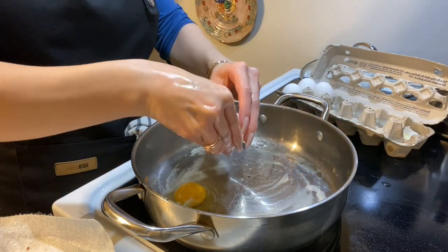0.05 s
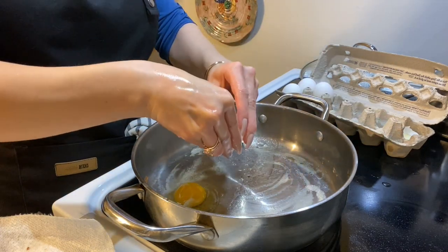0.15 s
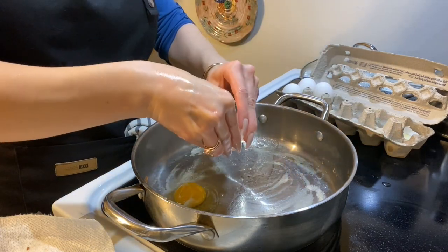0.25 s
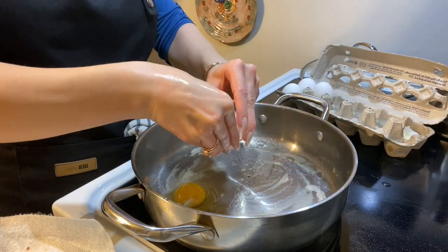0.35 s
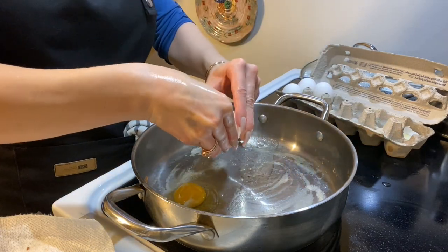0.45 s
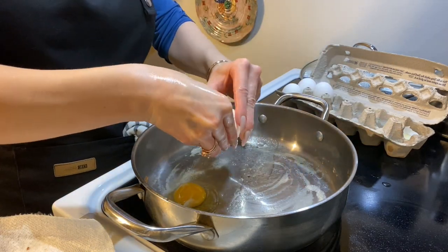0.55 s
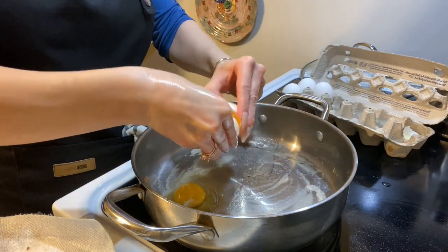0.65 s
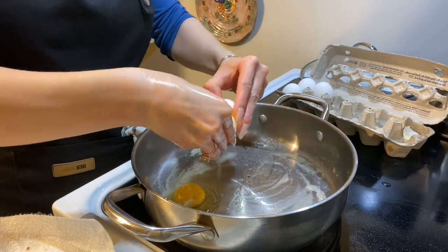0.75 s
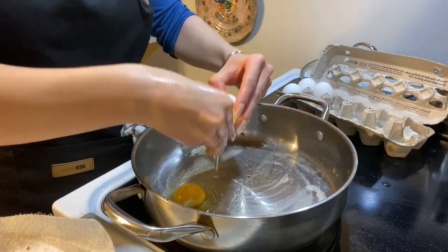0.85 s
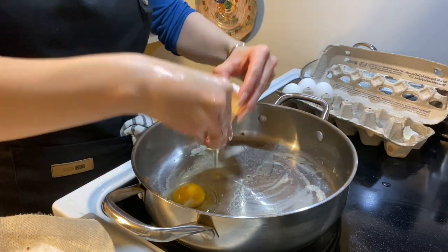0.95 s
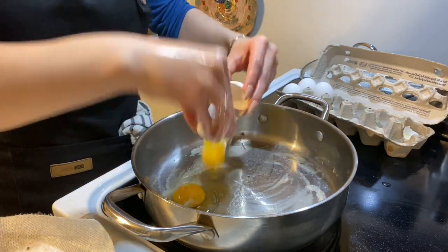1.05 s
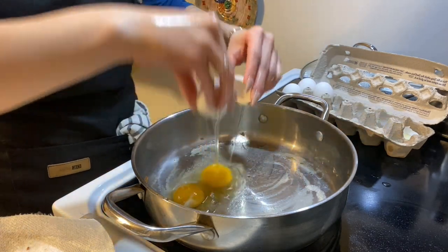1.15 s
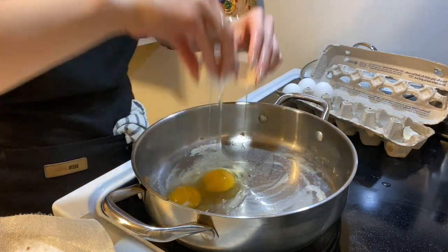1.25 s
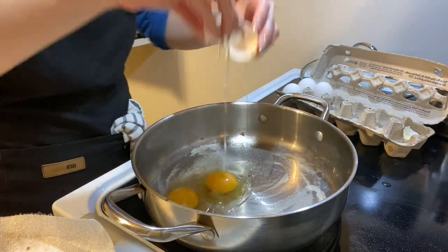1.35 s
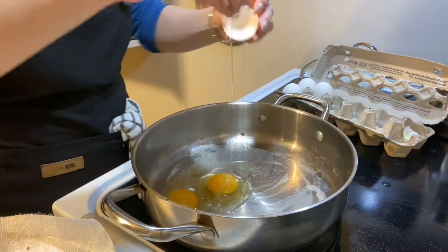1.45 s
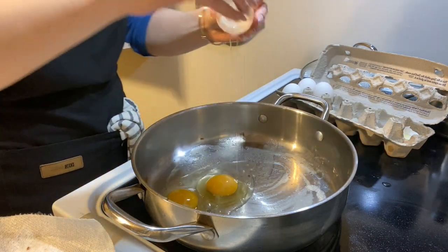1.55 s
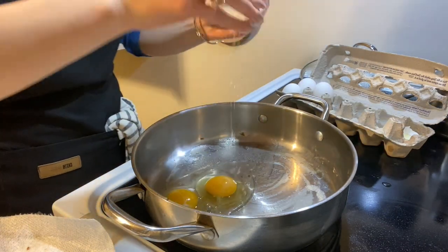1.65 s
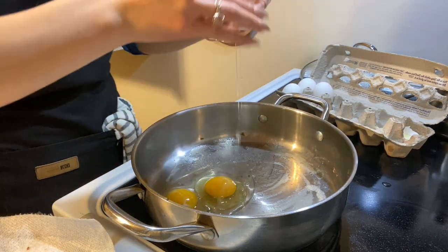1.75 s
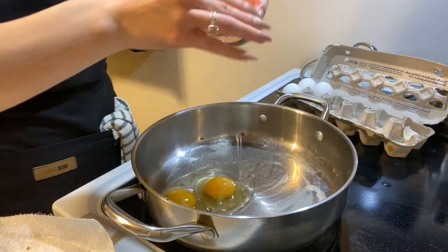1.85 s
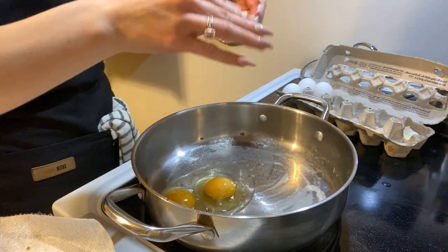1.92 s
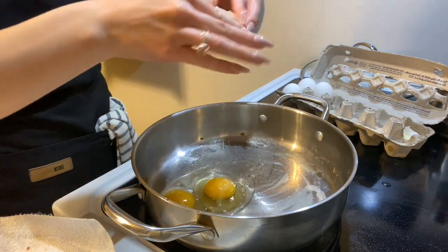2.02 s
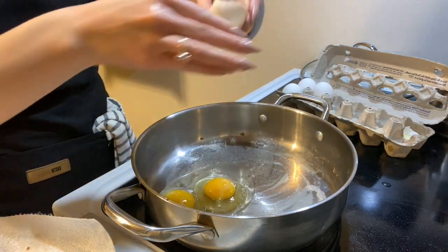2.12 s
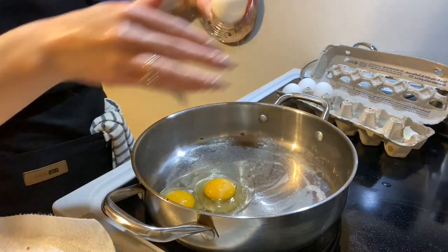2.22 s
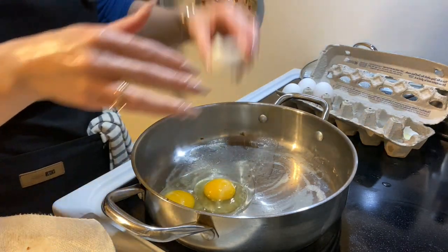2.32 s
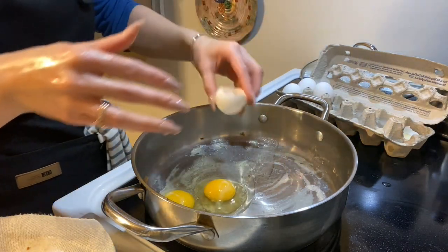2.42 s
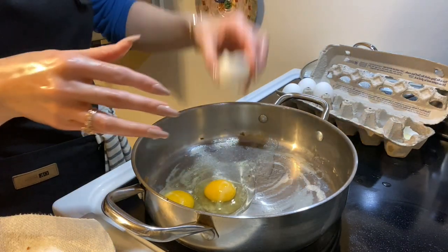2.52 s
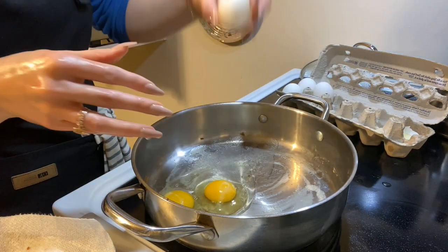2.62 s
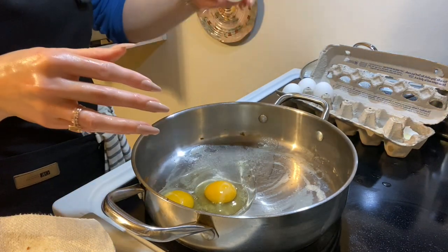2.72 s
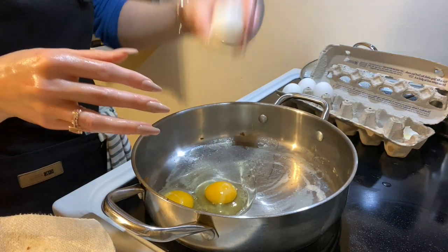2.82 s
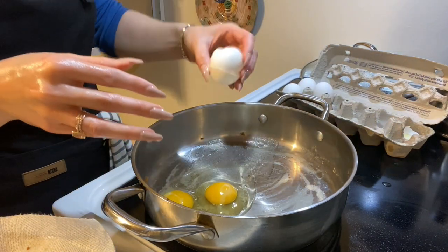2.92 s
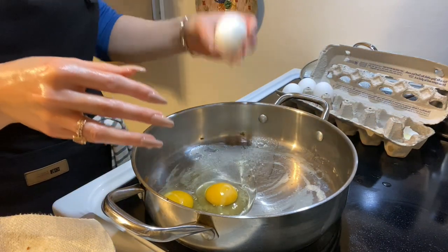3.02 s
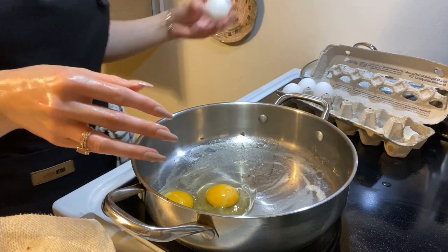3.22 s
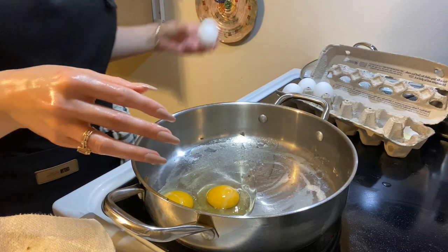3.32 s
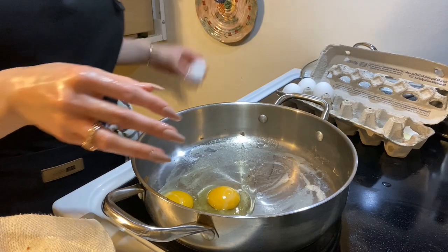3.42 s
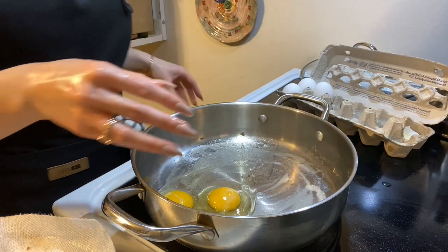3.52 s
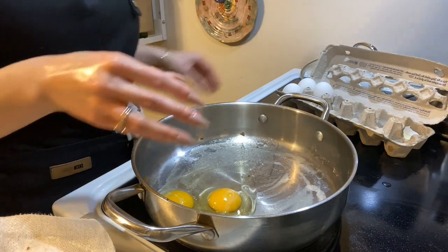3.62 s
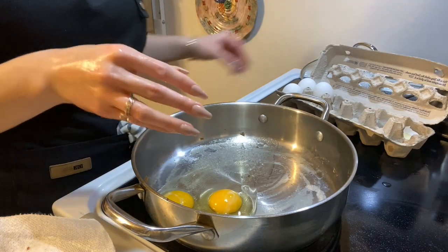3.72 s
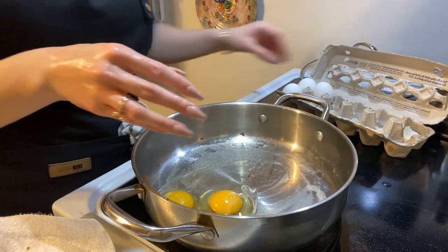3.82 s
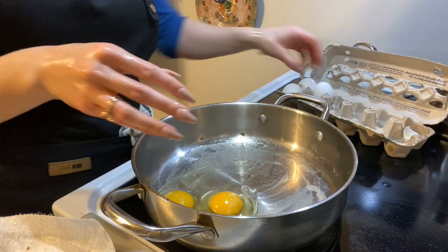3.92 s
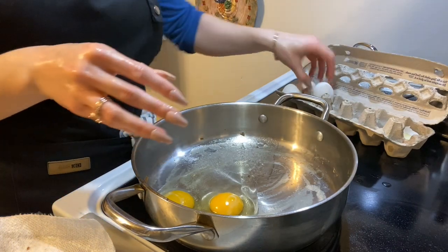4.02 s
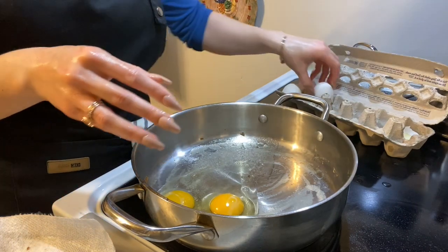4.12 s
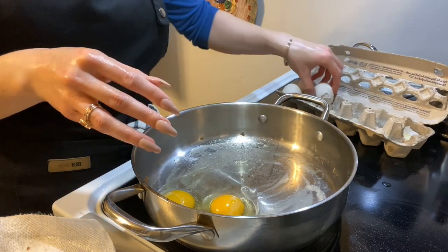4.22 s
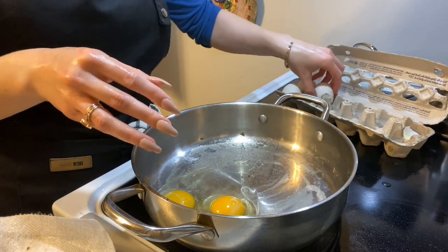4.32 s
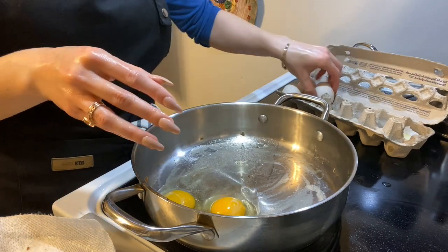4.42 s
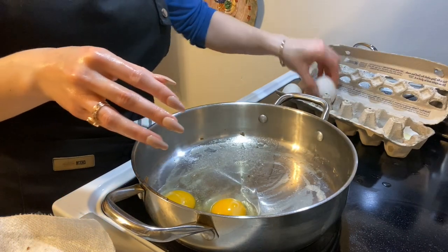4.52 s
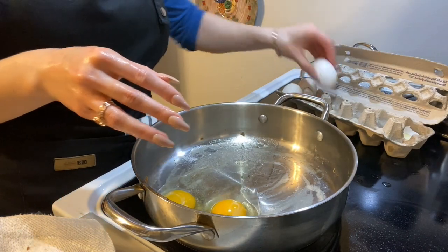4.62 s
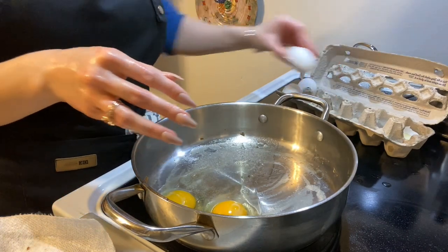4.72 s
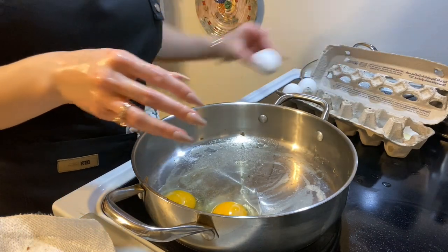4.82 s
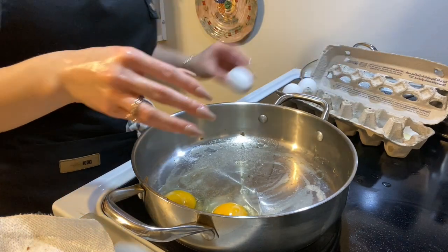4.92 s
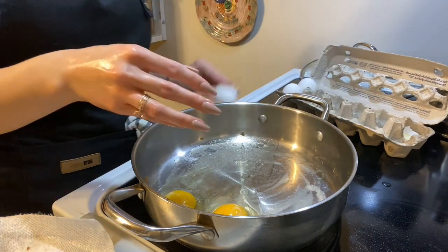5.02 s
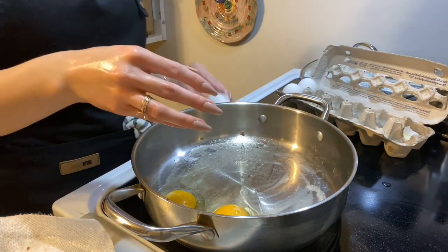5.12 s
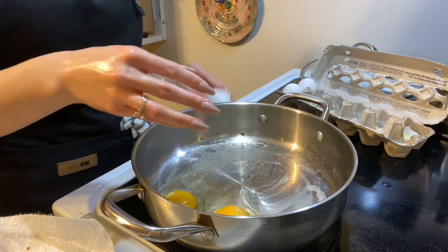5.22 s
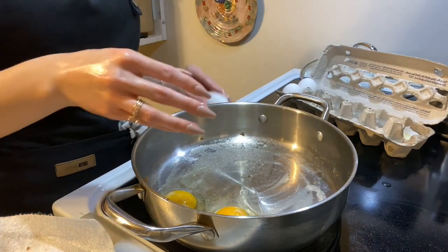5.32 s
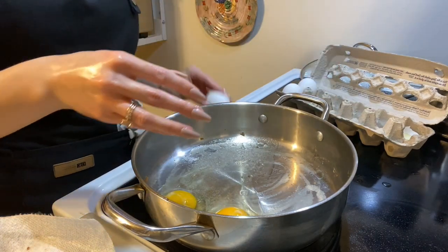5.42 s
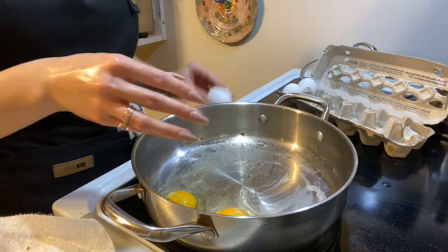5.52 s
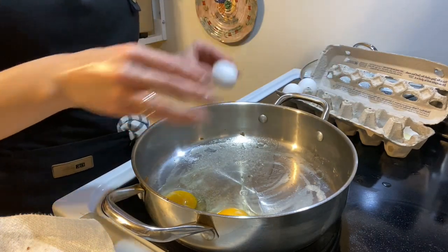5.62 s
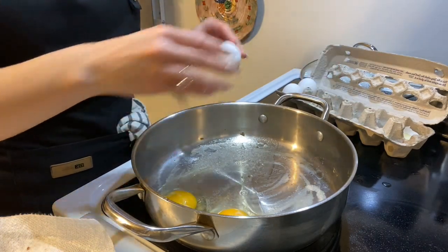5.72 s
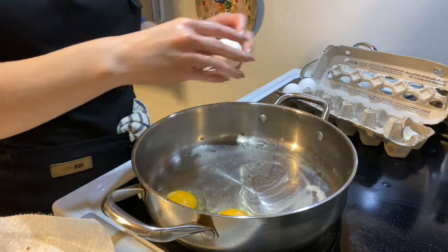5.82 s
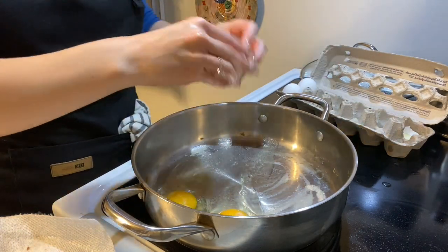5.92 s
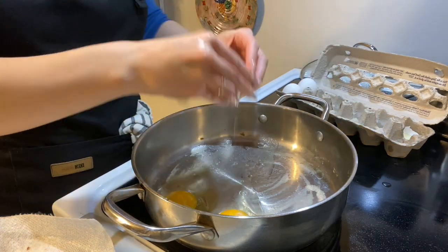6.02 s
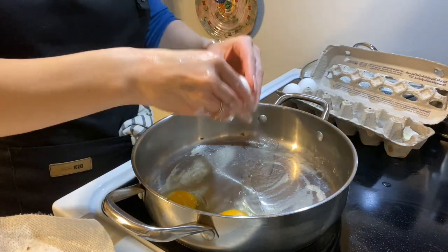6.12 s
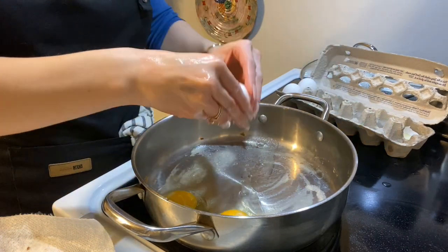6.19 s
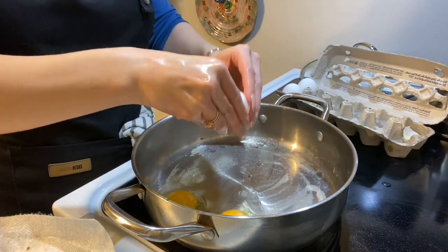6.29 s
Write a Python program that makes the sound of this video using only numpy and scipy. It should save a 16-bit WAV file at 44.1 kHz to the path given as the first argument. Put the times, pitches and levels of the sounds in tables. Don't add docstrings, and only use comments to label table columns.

```python
import sys
import numpy as np
from scipy import signal
from scipy.fft import rfft, irfft, next_fast_len
from scipy.io import wavfile
from scipy.ndimage import uniform_filter1d

SR = 44100
rng = np.random.default_rng(int(sys.argv[2]) if len(sys.argv) > 2 else 0)


def ratio_of_db(decibels):
    return 10 ** (np.asarray(decibels, float) / 20)


def wrap_up_sound(samples):
    columns = np.atleast_2d(samples).T
    tamed = np.clip(columns, -1, 1)
    steps = np.round(tamed * 32767).astype(np.int16)
    wavfile.write(sys.argv[1], SR, steps)


N = 280035

# [t/s, peak level/dB, build-up/s, ring time as a factor, left over right/dB]
TAP_BLOWS = [
    (5.055, -4.5, .0025, 0.63, 2.5),
    (5.238, -10, 0.0037, 0.33, 3.5),
    (5.429, -16.5, 0.00317, 0.44, 3.5),
]


def evened(x):
    return x / np.sqrt(np.mean(x ** 2) + 1e-20)


def peaked(x):
    return x / (np.abs(x).max() + 1e-20)


def read(points, hz):
    f, value = np.transpose(points)
    return np.interp(np.log(hz + 1), np.log(f + 1), value)


def add(mix, s, sound, pan_db):
    part = mix[:, round(s * SR):][:, :len(sound)]
    part += ratio_of_db([[pan_db / 2], [-pan_db / 2]]) * sound[:part.shape[1]]


def band(x, lo_hz, hi_hz):
    return signal.sosfilt(signal.butter(2, [lo_hz, hi_hz], "band", fs=SR, output="sos"), x)


def ring(x, hz, width_hz):
    r = np.exp(-np.pi * width_hz / SR)
    return signal.lfilter([1 - r], [1, -2 * r * np.cos(2 * np.pi * hz / SR), r * r], x)


def splinters(length_s, rise=0.1):
    length_s = max(length_s, 0.002)
    t = np.arange(round(0.12 * SR)) / SR
    slips = rng.standard_normal(len(t)) * ratio_of_db(2.54 * rng.exponential(1, len(t)))
    return slips * (1 - np.exp(-t / (rise * length_s))) * ratio_of_db(-60 * t / length_s)


def snaps(rows, width_hz, wall_hz, length_s, pan_db):
    out = np.zeros((2, N))
    for s, db, hz, bright_db in rows:
        drive = splinters(length_s)
        hollow = peaked(ring(ring(drive, hz, width_hz), hz, 5.0 * width_hz))
        wall = ratio_of_db(min(0.2 * bright_db - 3.0, 0)) * peaked(ring(drive, wall_hz, 740))
        edge = ratio_of_db(bright_db) * peaked(band(drive, 3100, 14000))
        add(out, s, ratio_of_db(db) * (hollow + wall + edge), pan_db + 3.4 * rng.standard_normal())
    return out


def rubbing(rows, hz, width_hz, rough_db):
    s, level_db, bright_db, fading_s = np.transpose(rows)[:, :, None]
    t = np.arange(N) / SR
    away = np.maximum(t - s, (s - t) / 0.82) / fading_s
    strokes = ratio_of_db(level_db - 37.5 * away)
    grip = evened(uniform_filter1d(rng.standard_normal(N), size=300))
    slips = rng.standard_normal(N) * ratio_of_db(min(rough_db, 2.2) * grip)
    dull = evened(band(ring(slips, hz, width_hz), 0.31 * hz, 4.3 * hz))
    bright = evened(band(slips, 4900, 15000))
    sound = strokes.sum(0) * dull + (strokes * ratio_of_db(bright_db)).sum(0) * bright
    return ratio_of_db([[0.6], [-0.6]]) * sound


def blows(rows, colours, decays):
    out = np.zeros((2, N))
    t = np.arange(SR // 2) / SR
    fine = np.fft.rfftfreq(SR // 2, 1 / SR)
    lead = 100
    for (s, db, contact_s, lasting, pan_db), colour in zip(rows, colours):
        hz, when, z = signal.stft(rng.standard_normal(SR // 2), SR, nperseg=512)
        t60 = lasting * read(decays, hz)[:, None]
        body = signal.istft(z * ratio_of_db(-60 * when / t60), SR, nperseg=512)[1][:len(t)]
        lines = rfft(body * (1 - np.exp(-t / contact_s)))
        energy = np.cumsum(abs(lines) ** 2)
        near = np.interp(1.07 * fine + 9, fine, energy) - np.interp(fine / 1.07 - 9, fine, energy)
        near /= 0.135 * fine + 18
        shaped = np.roll(irfft(lines * ratio_of_db(read(colour, fine)) / np.sqrt(near + 1e-20)), lead)
        fades = np.minimum(t * SR / lead, 1) * np.clip((0.45 - t) / 0.1, 0, 1)
        add(out, s - lead / SR, ratio_of_db(db) * peaked(shaped * fades), pan_db)
    return out


def air():
    # [f/Hz, level per Hz/dB]
    air_colour = [(15, -70.5), (25, -27.5), (53, -6), (85, -11), (110, -8), (158, -14.5), (216, -9.5),
                  (246, -13.5), (404, -22), (645, -27.5), (1440, -34.5), (5880, -62.5), (9150, -57),
                  (11300, -61), (12500, -89), (16200, -105), (22000, -120)]
    # [f/Hz, correlation]
    likeness = [(60, 1), (130, -0.059), (280, 0.029), (590, -0.29), (1270, -0.47), (2720, 1),
                (5830, -0.021), (12500, -0.65)]
    frames, hz = N // 256 + 5, np.fft.rfftfreq(1024, 1 / SR)
    a, b, c, d, patches = rng.standard_normal((frames, 513, 5)).T
    patches = uniform_filter1d(uniform_filter1d(patches, size=10, axis=0), size=14, axis=1)
    patches = evened(patches)
    same = np.clip(read(likeness, hz), -1, 1)[:, None]
    left = a + 1j * b
    z = np.array([left, same * left + np.sqrt(1 - same ** 2) * (c + 1j * d)])
    whine_db = 5.1 * np.exp(-((hz - 780) / 80) ** 2) - 12.0 * np.exp(-((hz - 570) / 70) ** 2)
    whine_db += 4.0 * np.tanh((2750 - hz) / 120) * np.exp(-((hz - 2750) / 900) ** 2)
    z *= ratio_of_db((read(air_colour, hz) + whine_db)[:, None] + 0.37 * patches)
    noise = signal.istft(z, nperseg=1024, noverlap=768)[1][:, :N]
    return ratio_of_db(-57.5) * evened(noise) * ratio_of_db([[1.2], [-1.2]])


def wavering(hz, wander):
    def drift():
        return evened(uniform_filter1d(uniform_filter1d(rng.standard_normal(N), size=2500), size=2500))
    phase = 2 * np.pi * np.cumsum(hz * (1 + wander * drift())) / SR
    return np.sqrt(2) * np.sin(phase) * ratio_of_db(2.6 * drift())


def fridge():
    # [t/s, level/dB]
    low_hum = [(0.0, -110), (1.0, -90.5), (2.1, -68.5), (2.421, -61.5), (3.5, -65), (4.14, -57.5),
               (4.5, -66.5), (5.5, -61), (6.35, -75.5)]
    low_db = np.interp(np.arange(N) / SR, *np.transpose(low_hum))
    hum = ratio_of_db(low_db) * wavering(119.5, 0.0095) + ratio_of_db(-64.5) * wavering(216, 0.012)
    return hum * ratio_of_db([[4.5], [-0.5]])


def fingers_on_shell():
    # [loudest at t/s, level/dB, brightness/dB, fading/s]
    finger_strokes = [(0.003, -63.5, 13.5, 0.084), (.2, -69.5, 5.5, 0.18), (.572, -59, 11.5, 0.096),
                      (.601, -55, 14.5, 0.026), (.632, -47.5, -26, 0.082), (.85, -59, -1.5, 0.06),
                      (1.13, -61.5, -7, 0.17), (1.53, -61.5, -12, 0.13), (1.575, -66, 10, 0.064),
                      (1.635, -47, 1.5, 0.11), (1.74, -55.5, -29, 0.16), (2.1, -77.5, -7, 0.65),
                      (2.62, -67, -25, 0.13), (5.9, -77, 0, 0.3), (6.1, -78, 1, 0.16),
                      (6.26, -60.5, 4, 0.072), (6.33, -64, 7.5, 0.18)]
    return rubbing(finger_strokes, 2400, 1030, 7.3)


def thuds():
    # [t/s, peak level/dB, centre f/Hz, length/s]
    soft_thuds = [
        (.008, -47.5, 705, 0.022),
        (0.282, -63, 680, 0.068),
        (0.562, -44, 670, 0.069),
        (0.629, -39.5, 676, 0.024),
        (3.701, -38.5, 90, .12),
        (4.085, -38.5, 244, 0.13),
        (4.228, -45, 286, 0.044),
        (4.551, -43, 301, 0.073),
        (6.244, -42.5, 298, 0.019),
        (6.291, -40.5, 368, 0.1),
    ]
    out = np.zeros((2, N))
    for s, db, hz, length_s in soft_thuds:
        push = band(splinters(length_s, rise=0.3), 0.5 * hz, 1.1 * hz)
        add(out, s, ratio_of_db(db) * peaked(push), 1.5)
    return out


def prised_shell():
    # [t/s, peak level/dB, shell ring f/Hz, bright snap above ring/dB]
    prising_snaps = [(0.0114, -54, 2020, 7), (0.1351, -63.5, 2060, 8), (0.2069, -60, 2070, 10.5),
                     (0.2508, -61, 2000, 10), (0.2763, -53, 2020, 9.5), (0.3222, -48, 1980, 10),
                     (0.3556, -54, 1920, 12.5), (0.4664, -65.5, 1950, 6), (0.5402, -55.5, 2060, 15.5),
                     (0.5741, -36.5, 2060, 10.5), (0.5984, -71, 2820, 21), (0.6262, -32, 2190, 9.5),
                     (0.7861, -47, 3440, -14), (0.826, -46.5, 1170, -1), (1.0705, -61, 1280, 13.5),
                     (1.132, -59, 2050, 19)]
    return snaps(prising_snaps, 260, 1800, 0.03, 1.5)


def pan_hum():
    # [loudest at t/s, level/dB, brightness/dB, fading/s]
    pan_strokes = [
        (.02, -50.5, -40, .15),
        (.28, -58, -35, .2),
        (.45, -67.5, -35, .2),
        (.6, -52, -45, .2),
    ]
    return rubbing(pan_strokes, 680, 90, 1.5)


def pops():
    # [t/s, peak level/dB, f/Hz, bandwidth/Hz, push/s]
    cup_pops = [
        (1.141, -24.5, 2010, 235, 0.0097),
        (2.036, -39.5, 2110, 404, 0.024),
        (2.238, -54, 1690, 307, 0.01),
    ]
    out = np.zeros((2, N))
    for s, db, hz, width_hz, push_s in cup_pops:
        cup = ring(ring(splinters(push_s), hz, width_hz), hz, 1.45 * width_hz)
        add(out, s, ratio_of_db(db) * peaked(band(cup, 0.67 * hz, 1.4 * hz)), 2.2)
    return out


def nested_halves():
    # [t/s, peak level/dB, shell ring f/Hz, bright snap above ring/dB]
    nesting_snaps = [(1.4182, -62.5, 2060, 18), (1.5145, -55, 1840, -8), (1.5609, -50, 3000, 11),
                     (1.5983, -46, 2640, 7), (1.7479, -56, 2040, 10), (1.7769, -39, 2450, 8),
                     (1.9071, -47, 2230, 9), (1.9594, -56, 1910, 4), (2.1475, -53, 1030, 1),
                     (2.2877, -62, 1610, -0.5), (2.5661, -46.5, 2140, 1), (2.5915, -49.5, 2200, 7.5)]
    return snaps(nesting_snaps, 220, 2930, 0.025, 0.4)


def shell_in_bin():
    # [t/s, peak level/dB, build-up/s, ring time as a factor, left over right/dB]
    bin_hits = [
        (3.649, -24.5, 0.0098, 0.85, 1.2),
        (3.691, -9, 0.0039, 0.4, .4),
        (3.708, -21, 0.0021, 0.58, 1.1),
    ]
    # [f/Hz, level per Hz/dB]
    hit_colours = [
        [(53, -22), (90, -3.5), (1210, -4), (1800, -11), (2400, -11.5), (7000, -20.5), (11500, -27.5)],
        [(29, -39), (55, -25.5), (182, 2), (500, -6.5), (670, -2), (950, -11), (2020, -11), (3500, -32)],
        [(29, -51.5), (55, -13.5), (182, -6), (520, -6), (650, -7), (2020, -8), (5000, -22), (11500, -37)],
    ]
    # [f/Hz, t60/s]
    bin_decay = [(100, 0.1), (300, 0.094), (1000, 0.26), (3000, 0.035), (9000, .05)]
    return blows(bin_hits, hit_colours, bin_decay)


def egg_slide():
    # [loudest at t/s, level/dB, brightness/dB, fading/s]
    pulp_slides = [
        (4.04, -50.5, -19, 0.029),
        (4.1, -55, -19, 0.11),
        (4.185, -54.5, -20.5, 0.23),
        (4.37, -62.5, -23, 0.11),
        (4.43, -55.5, -9, 0.14),
        (4.56, -50.5, -16, 0.051),
    ]
    return rubbing(pulp_slides, 1300, 1050, 3.4)


def carton_knocks():
    # [t/s, peak level/dB, hollow ring f/Hz, bright snap above ring/dB]
    cup_knocks = [
        (4.035, -57, 1100, 14),
        (4.087, -46.5, 1140, 5),
        (4.148, -62, 1100, -10.5),
        (4.225, -35.5, 1300, -69.5),
        (4.359, -52, 1460, -4),
        (4.417, -55, 1150, -22),
        (4.546, -41, 900, -5),
        (4.869, -68, 756, 5),
    ]
    return snaps(cup_knocks, 300, 2700, 0.044, -1.4)


def stove_taps():
    # [f/Hz, level per Hz/dB]
    tap_colours = [
        [(53, -38.5), (90, -13.5), (320, -7.5), (560, -10), (1050, -3), (1800, -14.5), (3000, -23),
         (11500, -34.5)],
        [(53, -41), (90, -5.5), (340, -16), (950, -13.5), (1500, -28), (2100, -25), (6500, -33), (11500, -33)],
        [(53, -23), (90, -1.5), (400, -16.5), (900, -15), (2200, -19), (3400, -32.5), (4200, -25.5),
         (11500, -29)],
    ]
    # [f/Hz, t60/s]
    stove_decay = [(100, 0.32), (300, 0.31), (1000, 0.087), (3000, 0.15), (9000, 0.039)]
    return blows(TAP_BLOWS, tap_colours, stove_decay)


def grate():
    # [f/Hz, level/dB, t60/s]
    grate_modes = [(124, -10, 0.26), (310.6, -9.5, 0.22), (451.6, -14.5, 0.13), (790.4, -8, 0.15),
                   (941, -9.5, 0.2), (1044, -7.5, 0.1), (1128, -20, 0.16), (700, -14, 0.17),
                   (1734, -20, .1), (2060, -18, 0.071), (2660, -22.5, .04)]
    # [lowest mode/dB, upper modes/dB]
    stir_levels = [
        (-12, -9),
        (-15.5, -24.5),
        (-14, -26),
    ]
    out = np.zeros((2, N))
    t = np.arange(SR // 2) / SR
    for (s, *_), (low_db, high_db) in zip(TAP_BLOWS, stir_levels):
        notes = np.zeros(len(t))
        for hz, db, t60 in grate_modes:
            stir_db = low_db if hz < 200 else high_db
            notes += ratio_of_db(db + stir_db - 60 * t / t60) * np.sin(2 * np.pi * (hz * t + rng.random()))
        add(out, s, notes * (1 - np.exp(-t / 0.00059)), 2.5)
    return out


def panel():
    # [t/s, level/dB]
    panel_sways = [
        (5.088, -27),
        (5.255, -25.5),
        (5.447, -28),
        (5.553, -36),
    ]
    sway_hz, rise_s, t60_s = 64, 0.012, 0.54
    out = np.zeros((2, N))
    t = np.arange(SR) / SR
    sway = np.sin(2 * np.pi * sway_hz * t) * (1 - np.exp(-t / rise_s)) * ratio_of_db(-60 * t / t60_s)
    for s, db in panel_sways:
        add(out, s, ratio_of_db(db) * peaked(sway), 3.0)
    return out


def gripped_egg():
    # [t/s, peak level/dB, shell ring f/Hz, bright snap above ring/dB]
    grip_snaps = [
        (5.5994, -45, 908, -6),
        (5.8875, -60.5, 1414, 12),
        (5.979, -74.5, 1600, 15.5),
        (6.0886, -63.5, 1920, 5),
        (6.2472, -46.5, 1530, 11.5),
        (6.2711, -50.5, 1310, 14.5),
        (6.2991, -49.5, 1300, 21),
        (6.3194, -53.5, 1020, -1.5),
    ]
    return snaps(grip_snaps, 210, 2680, 0.032, 1.6)


def kitchen(x):
    # [f/Hz, t60/s]
    room_decay = [(100, 0.59), (400, 0.36), (1500, 0.38), (4000, 0.39), (10000, 0.3)]
    out, clock = np.zeros((2, N)), np.arange(N) / SR
    for turn in range(3):
        echoes = np.zeros((2, SR // 2))
        at = np.arange(160, SR // 2 - 20, 20) + rng.integers(0, 20, (2, (SR // 2 - 161) // 20))
        np.put_along_axis(echoes, at, rng.choice([-1., 1.], at.shape), 1)
        hz, t, z = signal.stft(echoes, SR, nperseg=256)
        same = 1 / (1 + (hz[:, None] / 300) ** 4)
        z[1] = same * z[0] + np.sqrt(1 - same ** 2) * z[1]
        tail = signal.istft(z * ratio_of_db(-60 * t / read(room_decay, hz)[:, None]), SR, nperseg=256)[1]
        tail /= np.linalg.norm(tail[0])
        share = np.sqrt(2 / 3) * np.cos(2 * np.pi * (9 * clock + turn / 3))
        out += signal.fftconvolve((x.mean(0) * share)[None], tail, axes=1)[:, :N]
    return out


def ports(x):
    # [f/Hz, lead/rad]
    port_lead = [(60, -1.24), (350, 0.57), (650, -2.5), (1200, -1.07), (4000, -1.61), (9000, -2.5),
                 (12000, -3)]
    size = next_fast_len(N)
    turn = np.exp(0.5j * read(port_lead, np.fft.rfftfreq(size, 1 / SR)))
    return irfft(rfft(x, size) * [turn, 1 / turn], size)[:, :N]


def scene():
    hands = fingers_on_shell() + thuds() + prised_shell() + pops() + nested_halves()
    hands += egg_slide() + carton_knocks() + gripped_egg()
    drops = shell_in_bin()
    taps = stove_taps() + grate()
    room = kitchen(ratio_of_db(-8.5) * hands + ratio_of_db(-7.5) * taps + ratio_of_db(3.5) * drops)
    near = ports(hands + pan_hum() + taps + ratio_of_db(2.5) * drops)
    return air() + fridge() + panel() + room + near


def top_cut(x):
    return signal.sosfilt(signal.butter(12, 13100, fs=SR, output="sos"), x)


def record(dry):
    # [f/Hz, level/dB]
    mic_colour = [(300, -3.5), (7800, 5), (12000, -7), (12500, -16.5), (13000, -62.5)]
    hz = np.linspace(0, SR / 2, 257)
    colour = signal.firwin2(511, hz / hz[-1], ratio_of_db(read(mic_colour, hz)))
    cut = signal.sosfilt(signal.butter(3, 36, "high", fs=SR, output="sos"), dry)
    heard = 0.9 * np.tanh(signal.oaconvolve(cut, colour[None], "same") / 0.9)
    return top_cut(heard)


dry = scene()
out = record(dry)
wrap_up_sound(out)
```